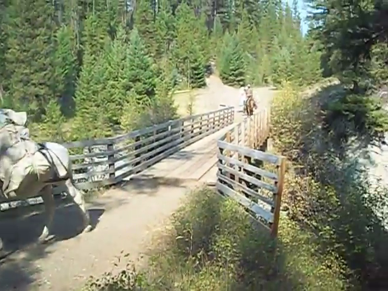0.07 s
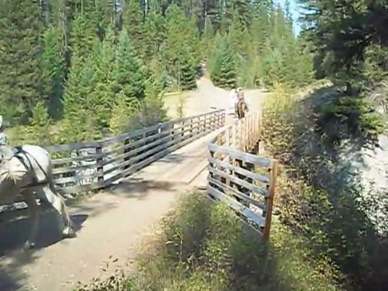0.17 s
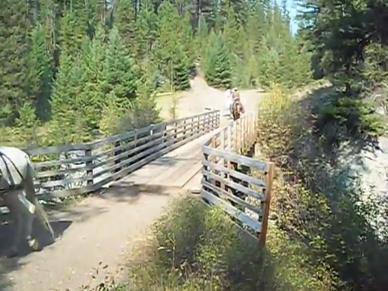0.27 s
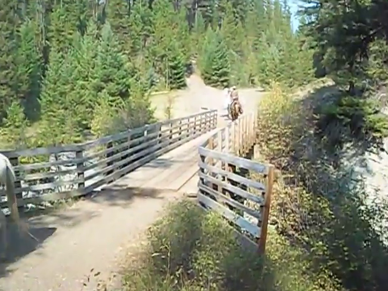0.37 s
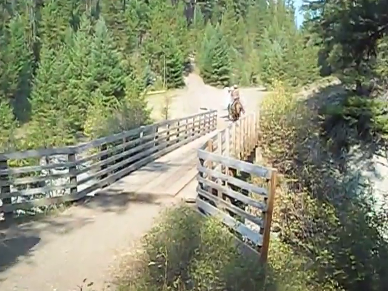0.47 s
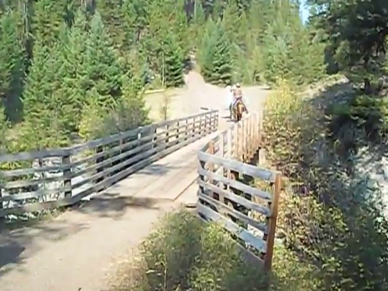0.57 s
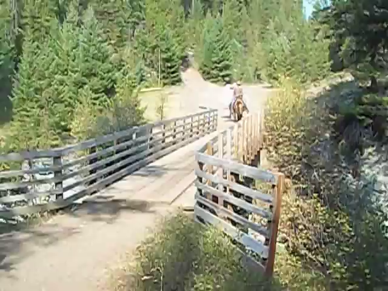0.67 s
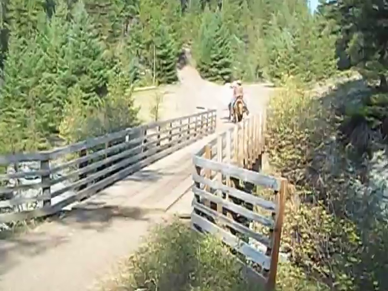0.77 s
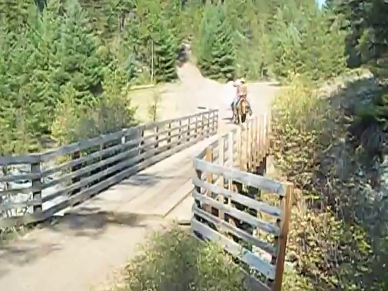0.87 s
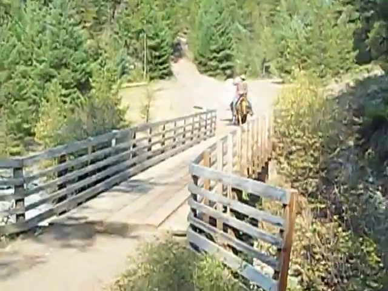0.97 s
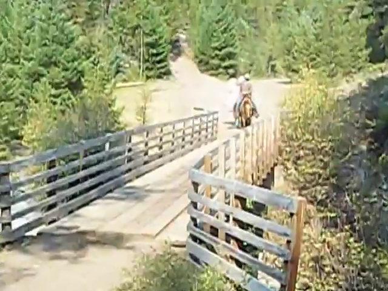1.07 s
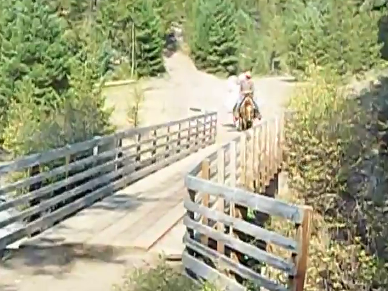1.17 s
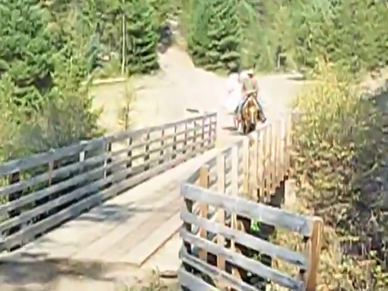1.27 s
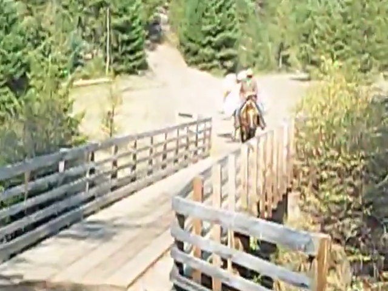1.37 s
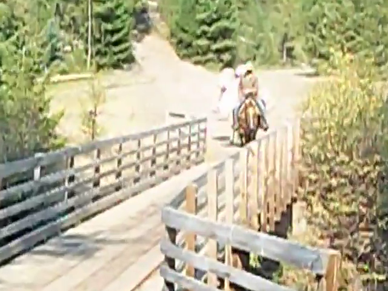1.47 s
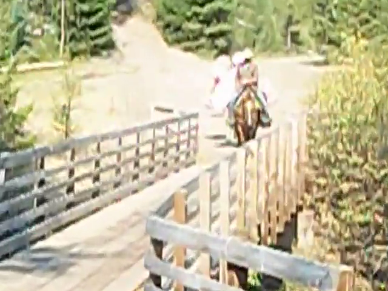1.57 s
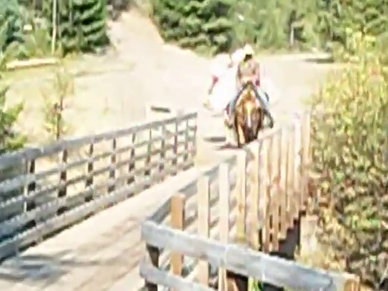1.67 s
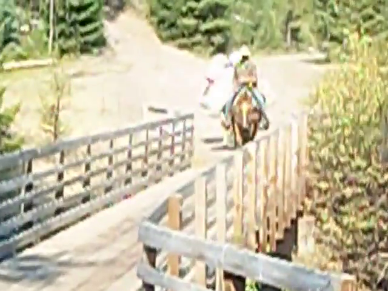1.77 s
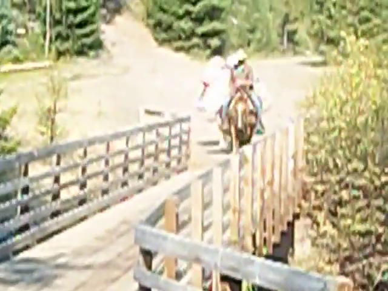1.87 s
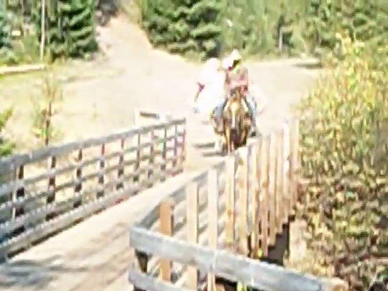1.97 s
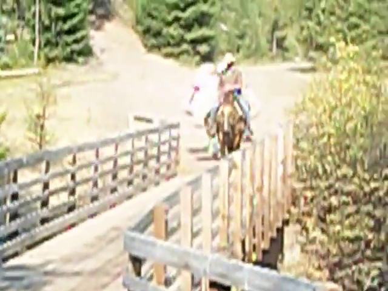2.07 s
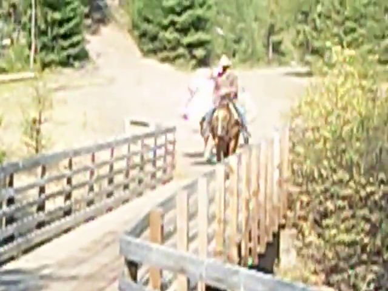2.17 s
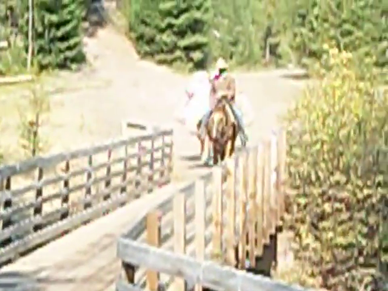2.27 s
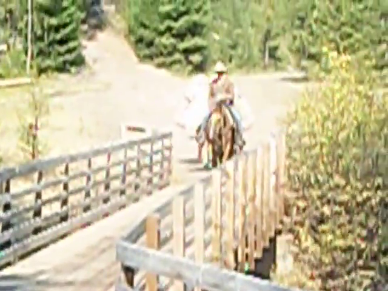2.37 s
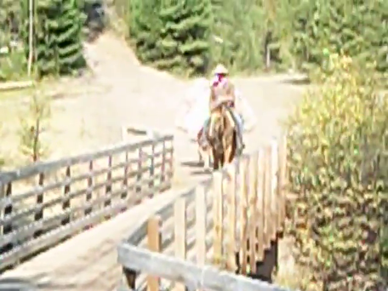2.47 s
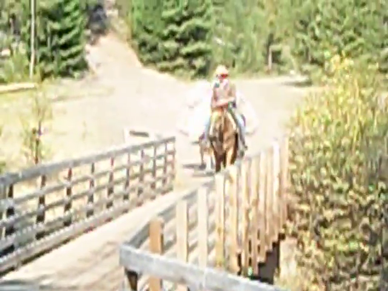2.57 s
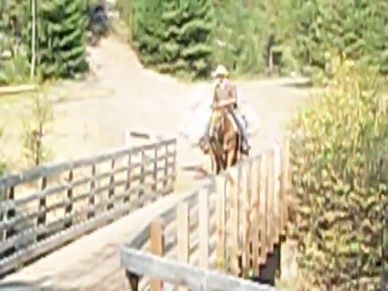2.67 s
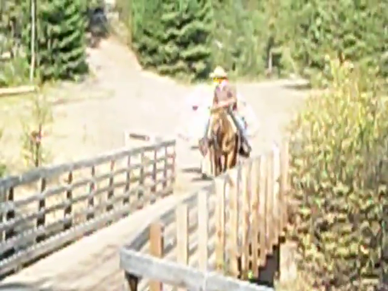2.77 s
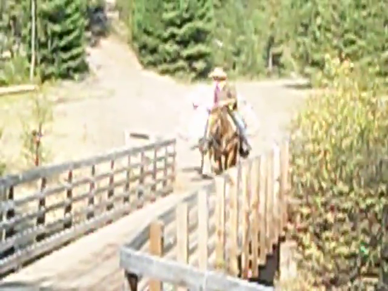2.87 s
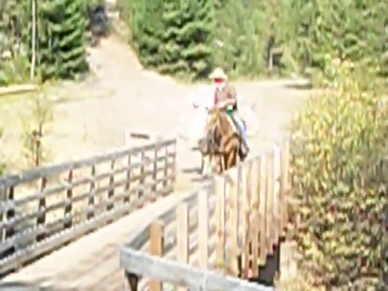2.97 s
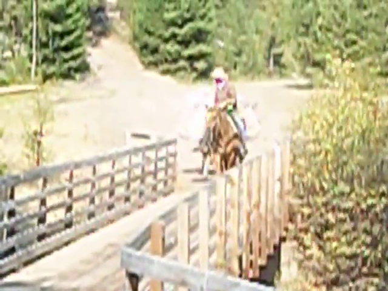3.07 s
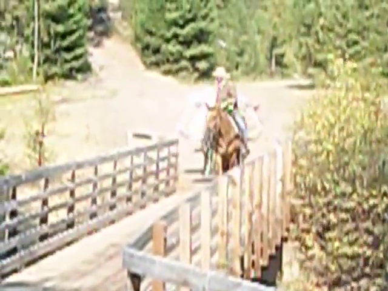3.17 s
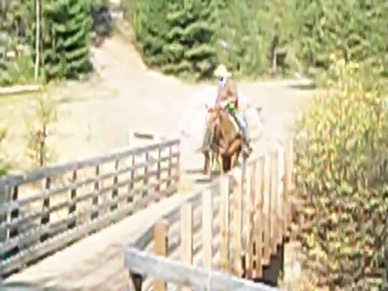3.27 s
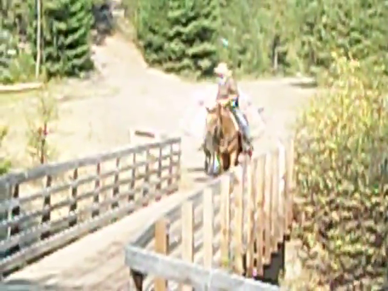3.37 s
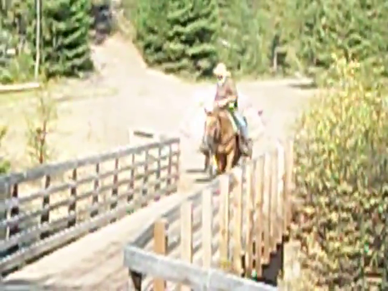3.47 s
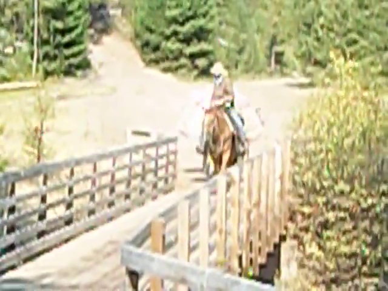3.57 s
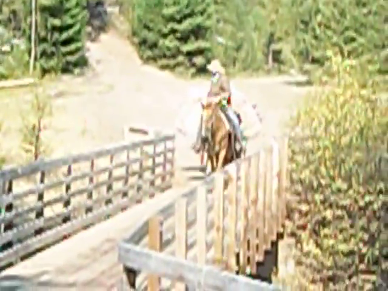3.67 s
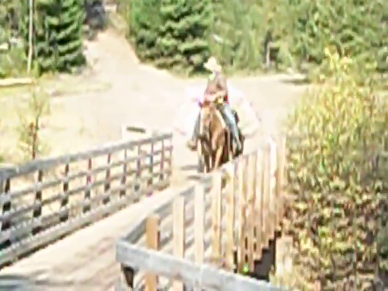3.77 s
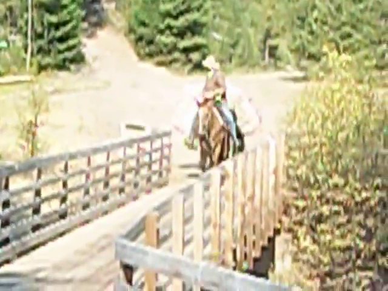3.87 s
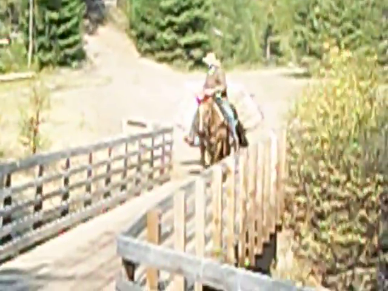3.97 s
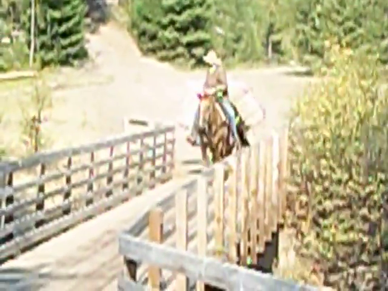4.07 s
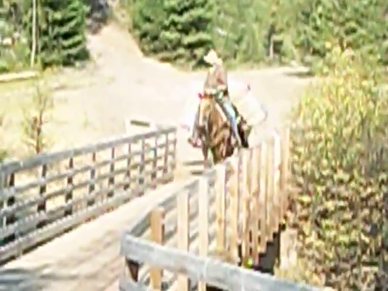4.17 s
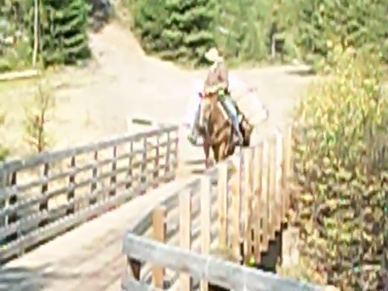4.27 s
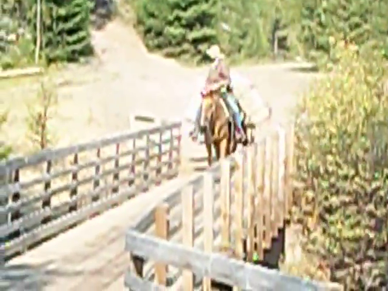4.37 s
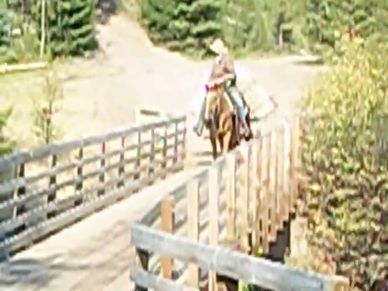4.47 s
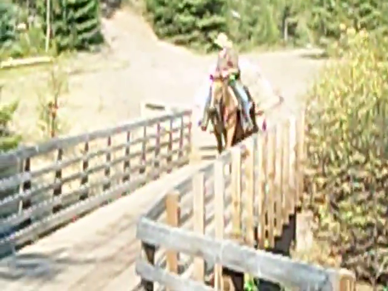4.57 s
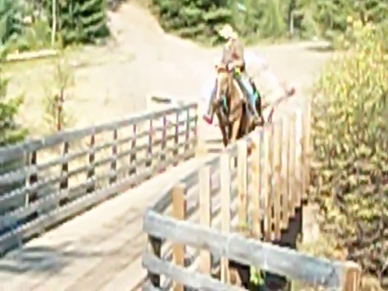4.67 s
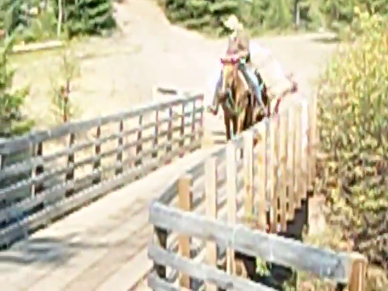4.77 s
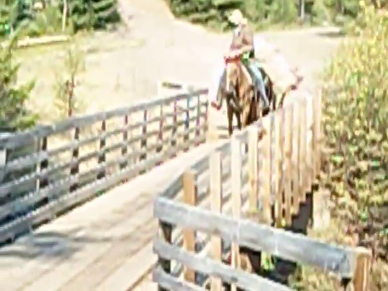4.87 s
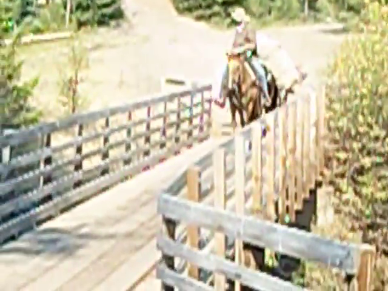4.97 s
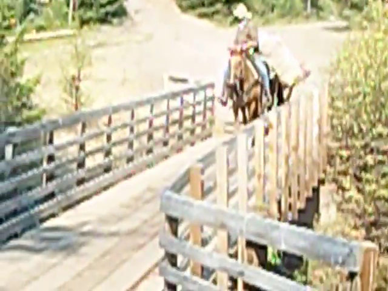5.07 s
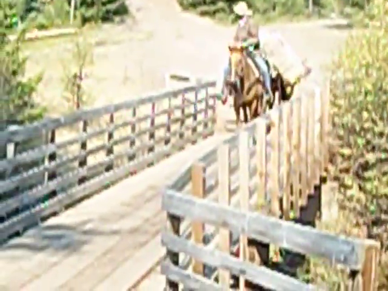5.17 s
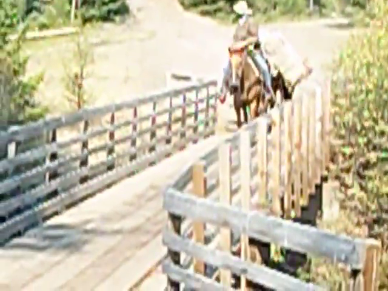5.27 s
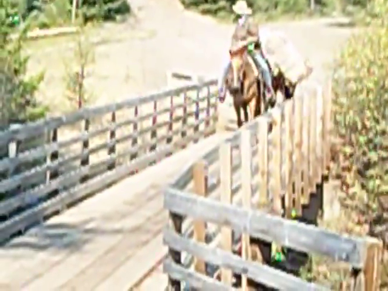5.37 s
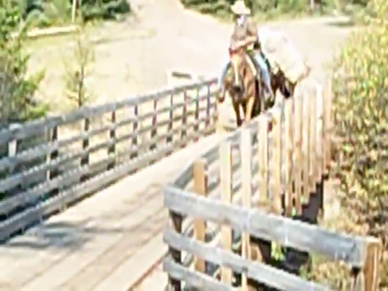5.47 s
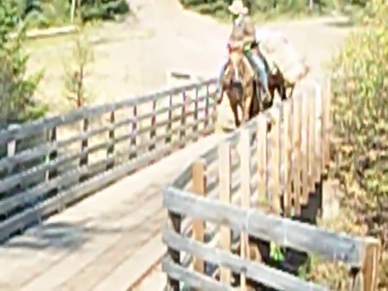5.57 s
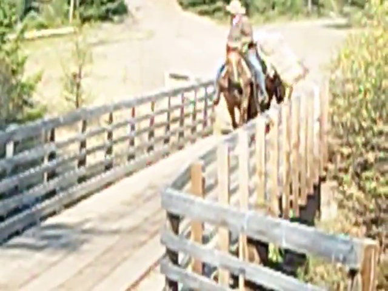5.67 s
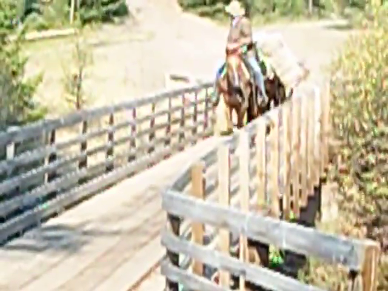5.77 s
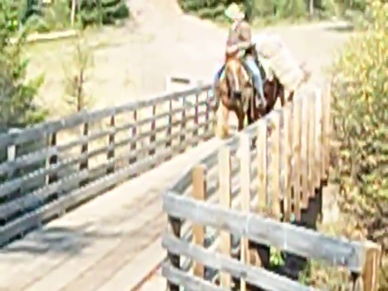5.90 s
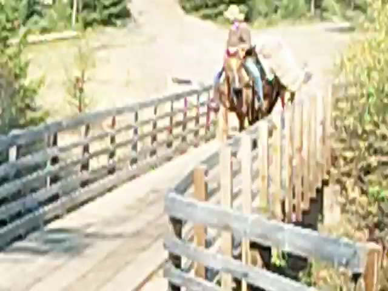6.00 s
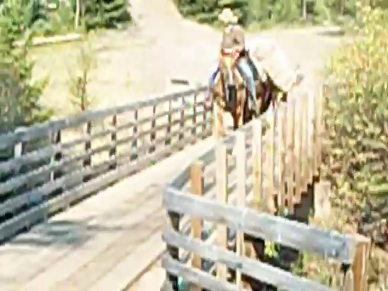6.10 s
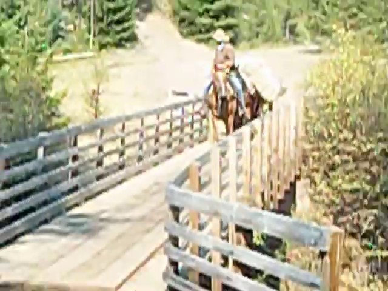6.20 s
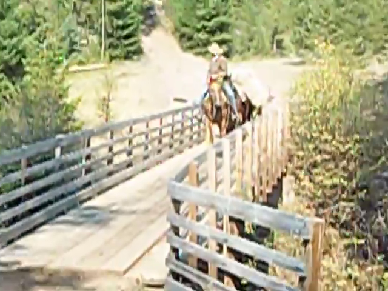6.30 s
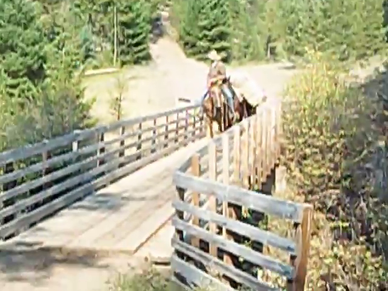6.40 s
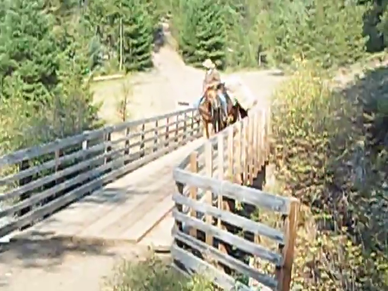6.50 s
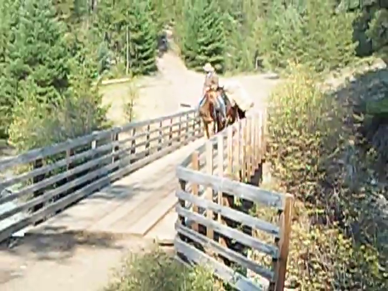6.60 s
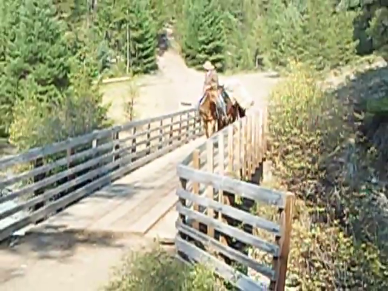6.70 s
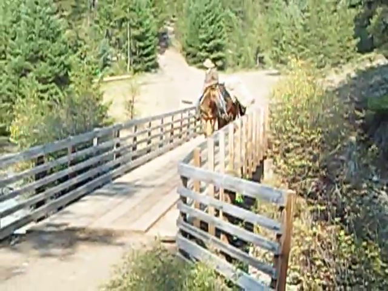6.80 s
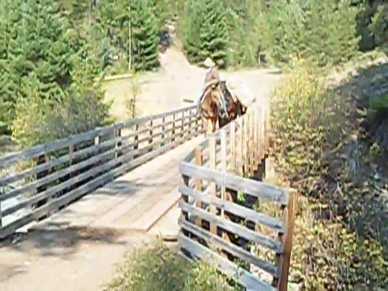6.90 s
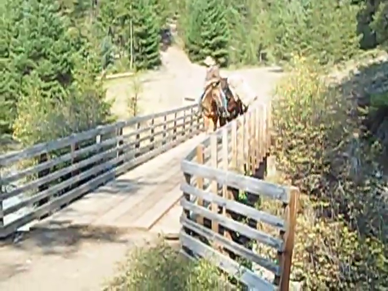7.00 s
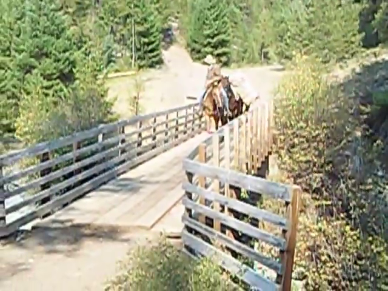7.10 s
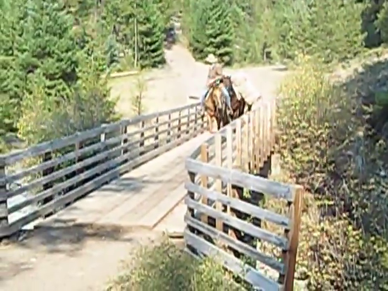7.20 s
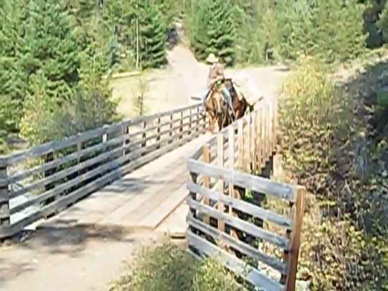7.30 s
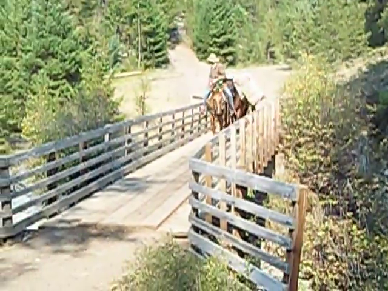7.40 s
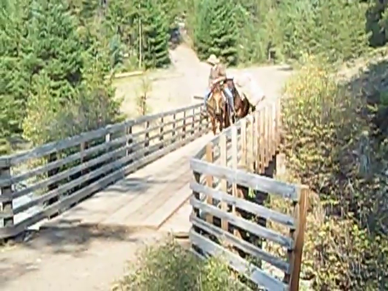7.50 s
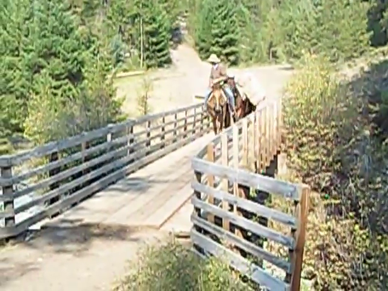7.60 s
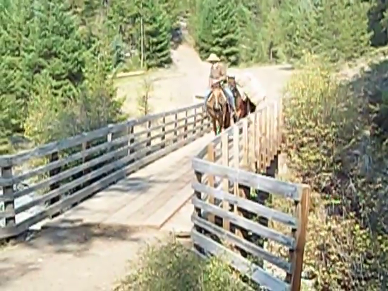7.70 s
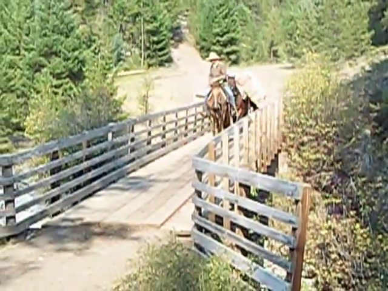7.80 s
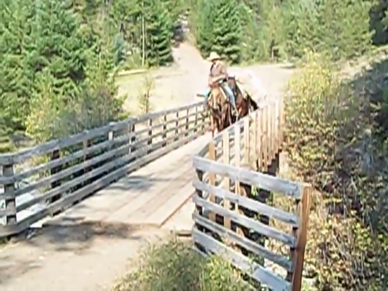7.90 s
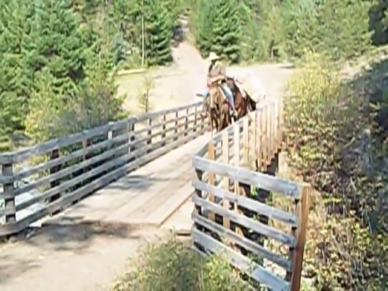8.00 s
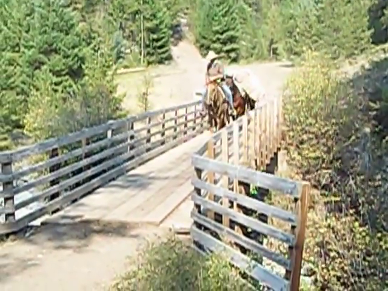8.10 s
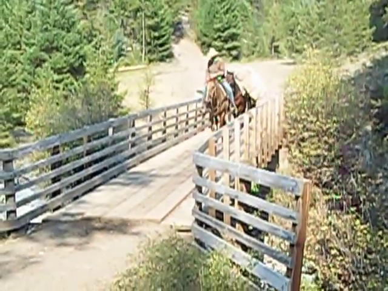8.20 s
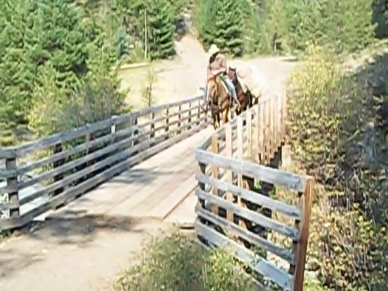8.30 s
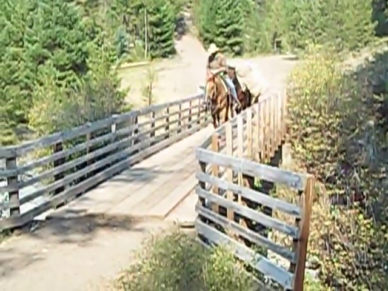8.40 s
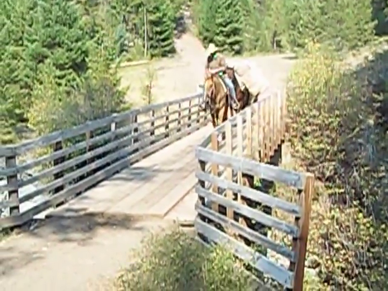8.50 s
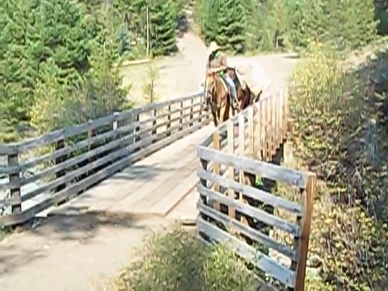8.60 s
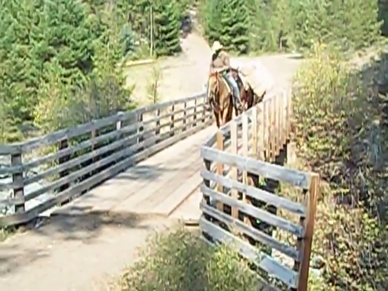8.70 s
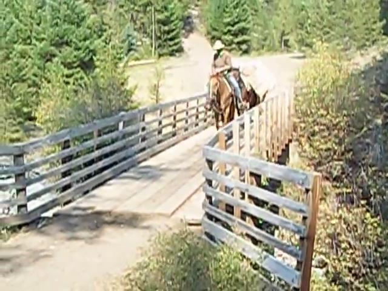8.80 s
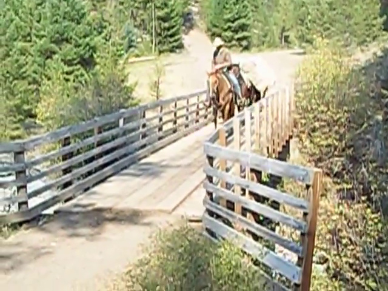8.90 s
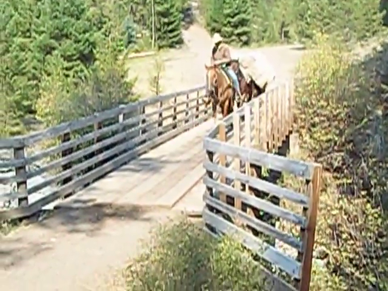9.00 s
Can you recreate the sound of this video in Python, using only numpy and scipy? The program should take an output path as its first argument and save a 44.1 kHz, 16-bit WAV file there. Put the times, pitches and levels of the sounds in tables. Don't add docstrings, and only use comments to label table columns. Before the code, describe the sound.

Loud plastic snaps close by, then slow hoof clops and deep deck thuds growing nearer on loose planks, over faint rushing water.

```python
import sys
import numpy as np
from scipy import signal
from scipy.io import wavfile

SR = 44100
rng = np.random.default_rng(int(sys.argv[2]) if len(sys.argv) > 2 else 0)


def voltage_ratio(level):
    return 10 ** (np.asarray(level, float) / 20)


def generate_wav(sig):
    pcm = np.round(np.clip(np.atleast_2d(sig).T, -1, 1) * 32767).astype(np.int16)
    wavfile.write(sys.argv[1], SR, pcm)


N = 399105


def rms_one(x):
    return x / np.sqrt(np.mean(x ** 2) + 1e-20)


def band(x, low_hz, high_hz, order=2):
    sos = signal.butter(order, [low_hz, min(high_hz, 0.45 * SR)], "band", fs=SR, output="sos")
    return signal.sosfilt(sos, x + 1e-18)


def seconds_axis(seconds):
    return np.arange(int(seconds * SR)) / SR


def fade(t, t60):
    return voltage_ratio(-60 * t / t60)


def drift(rate_hz):
    r = np.exp(-2 * np.pi * rate_hz * 40 / SR)
    slow = signal.lfilter([1], [1, -2 * r, r * r], rng.standard_normal(N // 40 + 2002))[2000:]
    return np.interp(np.arange(N) / 40, np.arange(len(slow)), rms_one(slow))


def ring(force, hz, t60):
    r = voltage_ratio(-60 / (t60 * SR))
    w = 2 * np.pi * hz / SR
    return signal.lfilter([0, np.sin(w)], [1, -2 * r * np.cos(w), r * r], force + 1e-18)


def contact(seconds, size):
    push = np.zeros(size)
    bump = np.hanning(max(int(seconds * SR), 3) + 2)[1:-1]
    push[:len(bump)] = bump / bump.sum()
    return push


def body(force, modes, spread_db, detune):
    total = 0
    for k, (hz, db, t60) in enumerate(modes):
        strength, shift = rng.standard_normal(2)
        tone = ring(force, hz * (1 + detune * shift), t60)
        total = total + voltage_ratio(db + spread_db * strength) * tone * (-1) ** k
    return total


def add(track, wave, s, peak_db):
    i = max(int(s * SR), 0)
    track[i:i + len(wave)] += (voltage_ratio(peak_db) * wave / np.abs(wave).max())[:N - i]


# pitch in Hz, level in dB per Hz.
STREAM_COLOUR = [(24, -38.5), (40, -15), (90, -5), (146, 2), (331, 2.5), (514, -5), (674, -1.5), (867, 2),
                 (1320, -9), (2040, -8), (2680, -6.5), (3910, -14), (4620, -12), (5020, -14), (5500, -24),
                 (5940, -27.5), (13100, -120)]


def stream(level_db):
    colour_hz, colour_db = np.transpose(STREAM_COLOUR)
    hz = np.maximum(np.fft.rfftfreq(N, 1 / SR), 1)
    colour = voltage_ratio(np.interp(np.log(hz), np.log(colour_hz), colour_db))
    noise = np.fft.irfft(np.fft.rfft(rng.standard_normal(N)) * colour, N)
    low, middle, high = band(noise, 10, 500), -band(noise, 500, 1200), band(noise, 1200, 9000)
    shared = drift(25)
    water = np.zeros(N)
    for part, depth_db in [(low, 1.1), (middle, 1.0), (high, 0.7)]:
        water += part * voltage_ratio(depth_db * (shared + drift(15)))
    return voltage_ratio(level_db) * water / np.std(band(noise, 300, 6000))


# pitch in Hz, level in dB, ring time (to -60 dB) in seconds.
DECK_MODES = [
    (57.4, -4, 0.47),
    (92.2, -6.5, 0.45),
    (116.7, -6, 0.33),
    (137.1, -3, 0.26),
    (169, -3, 0.16),
]


def rumble(level_db):
    shake = rng.standard_normal(N) * voltage_ratio(5.1 * drift(3.4))
    loose = [(hz, db, t60 / 3) for hz, db, t60 in DECK_MODES]
    return voltage_ratio(level_db) * rms_one(band(body(shake, loose, 0, 0), 60, 250))


# time in seconds, stream level in dB, deck rumble level in dB.
BACKGROUND = [
    (0.0, -40, -54),
    (7.591, -39.5, -37.5),
    (7.99, -39, -30),
    (9.05, -40, -34),
]


def background():
    s, stream_db, rumble_db = np.transpose(BACKGROUND)
    t = np.arange(N) / SR
    return stream(np.interp(t, s, stream_db)) + rumble(np.interp(t, s, rumble_db))


def air():
    return voltage_ratio(-58.5 + 2.0 * drift(2)) * rms_one(band(rng.standard_normal(N), 12, 40))


# start in seconds,
# peak level in dB, middle pitch in Hz.
STONE_FLICKS = [(0.337, -31, 2590), (0.4259, -31, 4270), (0.709, -32, 2550), (0.7483, -26.5, 2220),
                (0.9852, -31, 2520), (1.237, -32, 1950), (1.289, -20, 2400), (1.306, -24.5, 2580),
                (1.5307, -26.5, 2590), (1.607, -37, 4400), (1.644, -22, 4570), (1.8255, -26.5, 2530),
                (2.0755, -30, 2600), (2.135, -31.5, 2340), (2.624, -32, 1900), (2.6933, -24, 2120),
                (2.9483, -30.5, 2250), (3.3687, -31, 2640), (3.5269, -32, 2060), (4.268, -21, 2390),
                (4.283, -22, 1190), (4.2905, -26, 2160), (4.296, -34, 2310), (4.4563, -28, 2000),
                (4.7293, -29, 2540), (5.3812, -30, 2210), (0.5877, -26, 4000), (1.7236, -20, 660),
                (4.9176, -19, 1480), (1.211, -32, 4350), (1.243, -34, 4300), (6.2405, -37, 2870),
                (6.4936, -26, 2780), (8.448, -24.5, 1320), (8.152, -29, 1350), (8.22, -25, 1400),
                (1.332, -30, 3620)]
# start in seconds, peak level in dB, middle pitch in
# Hz.
CHIPS_AND_GRIT = [
    (2.1, -27, 2200),
    (3.3, -29.5, 4200),
    (2.478, -33, 4000),
    (4.098, -21.5, 1500),
    (3.3, -25, 2700),
    (3, -20, 1100),
    (1.6, -27.5, 4400),
    (3.912, -25, 1460),
                  (0.077, -26, 2600),
    (0.077, -31.5, 4800),
    (0.603, -33, 3400),
    (0.885, -30, 4450),
    (1.364, -28, 1220),
    (2.911, -29, 1170),
    (2.974, -27, 1170),
    (3.263, -28, 3900),
    (8.633, -33, 3390),
    (6.2403, -19, 1050),
]


def flicks(rows):
    out, t = np.zeros(N), seconds_axis(0.03)
    t60 = 0.016
    for s, db, hz in rows:
        force = contact(0.0001, len(t)) + 0.45 * rng.standard_normal(len(t)) * fade(t, t60)
        modes = [(hz * 0.49, -6, t60 * 0.55), (hz, 0, t60), (min(hz * 1.9, 5200), -8, t60 * 0.4)]
        wave = body(force, modes, spread_db=2.8, detune=0.012)
        add(out, band(wave, hz / 2.4, hz * 2.9, order=1), s, db)
    return out


# start in seconds, peak level in dB, pitch of the hollow in Hz.
LEAVING_HOOVES = [(0.079, -20, 740), (0.278, -28, 835), (0.392, -29, 575), (0.45, -23.5, 553),
                  (0.484, -19.5, 846), (0.623, -27.5, 740), (0.745, -25, 810), (0.999, -24, 1000),
                  (1.039, -30, 930), (1.213, -27, 690), (1.295, -26.5, 500), (1.33, -23, 900),
                  (1.374, -28, 740), (1.504, -25.5, 1036), (1.985, -27, 658), (2.144, -25, 723),
                  (2.206, -26, 490), (2.677, -29.5, 815), (2.824, -29, 530)]
# start in seconds, peak level in dB, pitch of the hollow in Hz.
FLAT_HOOVES = [(3.262, -25.5, 513), (3.292, -28, 565), (3.554, -32, 644), (4.319, -24.5, 794),
               (4.48, -27, 793), (4.552, -21.5, 853), (4.631, -24.5, 760), (5.012, -27, 766),
               (5.114, -27.5, 516), (5.299, -19.5, 805), (5.385, -25.5, 744), (5.563, -26, 746),
               (5.78, -30, 557), (6.056, -24, 707), (6.289, -28, 662), (6.33, -31, 866), (6.555, -28, 501),
               (7.005, -35, 845), (7.069, -31.5, 600), (7.205, -30.5, 640), (7.28, -20.5, 787),
               (7.5255, -14, 720), (7.579, -25, 800), (7.711, -34, 686), (8.032, -29, 680),
               (8.221, -12, 710), (8.295, -16.5, 760), (8.525, -19, 714), (8.979, -33, 784),
               (9.03, -27, 830)]
# start in seconds, heel level in dB, heel pitch in Hz,
# delay of the toe in seconds, toe level in dB.
ROLLED_HOOVES = [
    (2.962, -23.5, 700, 0.028, -23),
    (3.832, -20.5, 824, 0.026, -23),
    (4.815, -22, 800, 0.028, -23),
    (6.2541, -13, 665, 0.012, -20.5),
    (6.573, -18.5, 830, 0.01, -21.5),
    (6.892, -18, 740, 0.018, -29),
    (7.82, -19.5, 690, 0.015, -22),
    (8.139, -16, 830, 0.016, -15.5),
    (8.784, -21.5, 863, 0.016, -19),
]


def clops():
    out, t = np.zeros(N), seconds_axis(0.2)
    cup_hz, t60 = 757, 0.038
    hits = LEAVING_HOOVES + FLAT_HOOVES
    for s, heel_db, hz, lag, toe_db in ROLLED_HOOVES:
        hits = hits + [(s, heel_db, hz), (s + lag, toe_db, cup_hz ** 2 / hz)]
    for s, db, hz in sorted(map(tuple, hits)):
        settling = np.clip(t / 0.0014, 0, 1) * fade(t, 1.6 * t60)
        force = contact(0.00064, len(t)) + 0.11 * rng.standard_normal(len(t)) * settling
        splinters = band(force, 700, 2600)
        add(out, splinters, s - 0.001, db - 24.0)
        swell = ring(ring(force, hz, 0.0048), hz, 0.004)
        modes = [(hz, 0, t60 * 0.42), (hz * 0.99, -6, t60 * 0.091),
                 (hz * 1.147, -3, t60 * 0.45), (hz * 0.92, -10, t60 * 0.29)]
        add(out, body(swell, modes, spread_db=4, detune=0.02), s - 0.002, db)
    return out


def under_deck(x):
    t = seconds_axis(0.3)
    scatter = rng.standard_normal(len(t)) * np.clip(t / 0.016, 0, 1) * fade(t, 0.52)
    tail = signal.oaconvolve(x, scatter / np.linalg.norm(scatter))[:N]
    return voltage_ratio(-11) * band(tail, 250, 2200, order=1)


# delay in seconds, level in dB.
ECHO_PATHS = [
    (.013, -16),
    (.024, -20.5),
    (.039, -18),
    (.057, -19.5),
    (.083, -27),
]


def rails(x):
    dull = band(x, 150, 3500, order=1)
    out = np.zeros(N)
    for k, (s, db) in enumerate(ECHO_PATHS):
        late = np.interp(np.arange(N) - s * SR, np.arange(N), dull, left=0)
        out += voltage_ratio(db) * late * (-1) ** k
    return out


# start in seconds, peak level in dB, rattle length in seconds,
# pitch of the lever body in Hz, treble level in dB.
LEVER_HITS = [(0.1326, 10, 0.0048, 1690, -3), (0.1731, -7.5, 0.00023, 1440, -3.5),
              (0.182, -33, 0.0027, 1770, 2), (0.2202, -2, 0.00022, 1370, 0), (0.229, -22, 0.010, 1713, -2),
              (1.7202, -10.5, 0.0016, 2090, 1), (1.7218, -4, .0036, 2120, 0),
              (1.7325, -22, 0.00089, 1830, 2.5), (4.9166, -17, .002, 2300, -6),
              (6.2401, -13, 0.00087, 2780, -10.5), (6.6945, -20, 0.0008, 2820, 5),
              (6.701, -17, 0.0021, 1716, -3.5), (6.7033, -19.5, 0.001, 2030, -2.5),
              (6.7180, -5, 0.0003, 1800, 3)]
# start in seconds, peak level in dB, rattle length in seconds,
# pitch of the lever body in Hz, treble level in dB.
LEVER_BOUNCES = [
    (0.1762, -23, .0003, 1170, -19),
    (1.7344, -16, 0.00059, 1800, -1),
    (4.9198, -16, 0.002, 1400, -5),
    (6.6956, -19, 0.0013, 2780, -5),
    (6.7052, -14, 0.00074, 2280, -4),
    (6.7194, -0.5, 0.0003, 1840, 6),
    (0.1340, -2, 0.0014, 1710, 3),
    (0.188, -29, 0.0029, 1740, -6),
]
# pitch in Hz, level in dB, ring time in seconds.
LEVER_LOW = [
    (463, -1, 0.0044),
    (740, 6.5, 0.0033),
    (1090, 4, 0.004),
]
# multiple of the body pitch, level in dB, ring time in seconds.
LEVER_MIDDLE = [
    (0.762, -7, 0.0083),
    (1.001, 1, 0.0099),
    (1.249, 2, 0.0023),
]
# pitch in Hz, level in dB, ring time in seconds.
LEVER_HIGH = [
    (2600, -3, 0.0024),
    (2974, -1, 0.0076),
    (3420, -8.5, 0.0031),
    (4300, 3.5, 0.0033),
    (5200, -2, 0.0064),
    (6200, -2, 0.009),
]


def snaps(rows):
    out, t = np.zeros(N), seconds_axis(0.15)
    size = len(t)
    for s, db, length, hz, treble_db in rows:
        bass_db = -5.5 + 0.25 * min(db, 0) - 1.6 * treble_db
        touches = (rng.random(size) < 4000 / SR) * rng.choice([-1, 1], size) * rng.uniform(0.71, 1, size)
        rattle = np.clip((length - t) / 0.0005, 0, 1)
        rattle += 0.24 * fade(np.maximum(t - length, 0), 0.024)
        force = touches * rattle * (1 - 0.3 * np.clip(t / length, 0, 1))
        force[0] = 0.51
        held = 0.74 if length < 0.00028 else 1
        middle = [(k * hz, level, t60 * held) for k, level, t60 in LEVER_MIDDLE]
        wave = body(force, middle, spread_db=1, detune=0.02)
        wave += voltage_ratio(treble_db) * body(force, LEVER_HIGH, spread_db=0.86, detune=0.01)
        wave += voltage_ratio(bass_db) * body(force, LEVER_LOW, spread_db=1.0, detune=0.011)
        wave += 6.0 * band(force, 680, 4000, order=1)
        add(out, band(wave, 280, 6400), s, db)
    return out


# start in seconds, peak level in dB,
# pitch in Hz, ring time in seconds.
CAMERA_RINGS = [(0.1342, -2, 5190, .016), (0.139, -23, 5000, 0.04), (0.1345, -8, 1000, .018),
                (0.1733, -18, 5250, .012), (0.2204, -15, 5400, .012), (0.139, -25, 1650, 0.09),
                (0.2245, -24, 1720, 0.05), (0.2246, -30, 3150, 0.04), (1.726, -34, 5250, 0.1),
                (1.727, -26, 1750, .05), (1.728, -32, 3140, 0.08), (6.242, -18, 1690, 0.04),
                (6.241, -19, 2830, .012), (1.7226, -11, 5200, .016), (1.7222, -13, 1310, .018),
                (1.7228, -20, 5650, .01), (1.7232, -10, 2125, .018), (1.7238, -12, 3035, .016),
                (4.9168, -19, 2380, .008), (4.917, -22, 560, .02), (6.7180, -9, 1840, .022),
                (6.7184, -16, 3570, .01), (6.7184, -16, 4310, .01), (6.718, -21, 3160, 0.07),
                (6.719, -29, 5787, 0.11), (6.720, -26, 5230, 0.11), (6.6955, -18, 5230, .013),
                (6.701, -19, 5200, .012)]


def housing():
    out, size = np.zeros(N), int(0.15 * SR)
    for s, db, hz, t60 in CAMERA_RINGS:
        add(out, -ring(contact(0.0001, size), hz, t60), s, db)
    return out


# start in seconds, peak level in dB, length in seconds,
# middle pitch in Hz.
HOOF_DRAGS = [(0.294, -26, 0.11, 2190), (0.348, -23, 0.078, 890), (0.436, -27, 0.072, 1400),
              (0.627, -25, 0.066, 2160), (0.977, -23.5, 0.081, 2020), (1.201, -26, 0.064, 2600),
              (1.291, -26.5, .11, 1500), (1.498, -31, .05, 2480), (2.076, -37, 0.25, 2300),
              (2.651, -26, 0.19, 2400), (2.949, -31, 0.085, 1190), (2.391, -25, 0.036, 2360),
              (4.3, -34, 0.025, 2400), (8.14, -26, 0.043, 1440), (8.223, -32, 0.062, 1440)]


def scuffs():
    out, t = np.zeros(N), seconds_axis(0.3)
    size = len(t)
    for s, db, length, hz in HOOF_DRAGS:
        grains = (rng.random(size) < 1800 / SR) * rng.standard_normal(size)
        grains *= voltage_ratio(3.14 * rng.exponential(1, size))
        slide = np.sin(np.pi * np.clip(t / length, 0, 1)) ** 0.18
        add(out, band(grains * slide, hz / 2.0, hz * 1.23), s, db)
    return out


# start in seconds, peak
# level in dB, middle pitch in Hz.
GRIT_TICKS = [(0.312, -26.5, 2820), (0.488, -25, 2640), (0.587, -25, 2040), (0.65, -31, 1890),
              (0.673, -31, 1970), (0.8828, -29.5, 2430), (1.0186, -26, 2060), (1.1998, -27.5, 1570),
              (0.3566, -28.5, 2580), (1.332, -23, 1640), (1.6174, -27, 2320), (1.6416, -24.5, 1640),
              (2.097, -29, 2380), (2.2082, -28, 1900), (2.2396, -28.5, 4430), (2.4587, -29, 2770),
              (2.564, -23, 2280), (2.67, -23.5, 2380), (2.754, -22.5, 2460), (3.2627, -22.5, 2300),
              (3.5868, -30, 2470), (3.839, -26.5, 2430), (4.079, -21.5, 2970), (8.6353, -33, 2220),
              (5.1244, -24, 1360), (5.61, -29.5, 2440), (6.0367, -24, 2620), (6.0556, -26, 2370),
              (6.173, -26.5, 5200), (6.486, -25.5, 2600)]


def ticks():
    out, t = np.zeros(N), seconds_axis(0.08)
    for s, db, hz in GRIT_TICKS:
        burst = rng.standard_normal(len(t)) * fade(t, 0.031) * np.clip(t / 0.002, 0, 1)
        sparkle_db = -12 + 11 * np.log2(hz / 2400)
        wave = band(burst, hz / 1.24, hz * 1.2) + voltage_ratio(sparkle_db) * band(burst, 3600, 4900)
        add(out, wave, s - 0.001, db + 0.23)
    return out


# start in seconds, weight level in dB, boom pitch in Hz,
# end plank level in dB, plank pitch in Hz.
STEPS_OFF = [(0.35, -34, 116, -32, 223), (0.449, -40, 156, -33, 390), (0.878, -46, 211, -39, 262),
             (1.034, -30, 144, -30, 320), (1.214, -27, 125, -27.5, 208), (1.303, -25, 151, -25.5, 210),
             (1.65, -31, 204, -23.5, 293), (1.863, -36.5, 85.5, -30.5, 200), (1.983, -34.5, 114, -46, 250),
             (2.21, -24.5, 169, -26, 235), (2.565, -34, 115, -42, 250)]
# start in seconds, peak level in dB, deck pitch in Hz.
PAIR_THUDS = [(2.115, -24, 68.4), (2.697, -23, 71), (2.978, -26.5, 85.4), (3.266, -25.5, 69),
              (3.383, -35.5, 64), (3.551, -30, 78), (3.805, -24.5, 64.5), (4.313, -23, 116),
              (4.52, -32, 70), (4.616, -22, 158), (4.802, -26, 108), (5.273, -24, 90), (5.55, -20, 159),
              (5.742, -29, 152), (5.922, -25.5, 195), (6.046, -28.5, 159), (6.228, -18, 79),
              (6.54, -26.5, 156), (6.757, -24.5, 221), (6.887, -20.5, 164), (7.199, -26.5, 101),
              (7.279, -18.5, 137.4), (7.527, -14, 129), (7.794, -27, 107), (8.018, -23, 153),
              (8.112, -23.5, 90), (8.138, -15, 154), (8.429, -23.5, 72), (8.52, -19.5, 149),
              (8.78, -17.5, 144)]


def thuds():
    out, t = np.zeros(N), seconds_axis(0.5)
    share = t / 0.012
    leaving = [(s - 0.0044, db, hz) for s, db, hz, _, _ in STEPS_OFF]
    for s, db, hz in leaving + PAIR_THUDS:
        beams_db = -27.5 if s < 2.05 else -6.5
        t60 = 0.17 * (hz / 100) ** -0.39
        uneven = 0.031 * rng.standard_normal(len(t)) * share * np.exp(1 - share)
        force = signal.lfilter([0.05], [1, -0.95], contact(0.0045, len(t)) + uneven)
        boom = ring(force, hz, np.clip(0.8 * t60, 0.03, 0.5))
        boom += voltage_ratio(beams_db) * body(force, DECK_MODES, spread_db=1.0, detune=0.03)
        add(out, band(boom, 65, 600, order=1), s - 0.003, db + 0.5)
    return out


# start in seconds, peak level in dB, plank pitch in Hz.
PLANK_KNOCKS = [(2.099, -27, 431), (2.91, -40, 276), (2.972, -22, 326), (3.545, -28.5, 398),
                (3.842, -31, 249), (4.308, -32, 236), (4.471, -30, 257), (4.731, -30.5, 320),
                (4.809, -26.5, 210), (5.281, -32, 347), (5.311, -24.5, 319), (5.379, -30.5, 258),
                (5.926, -27, 320), (6.257, -23, 292), (6.311, -30.5, 212), (6.551, -34, 328),
                (6.601, -31, 272), (6.743, -28.5, 275), (6.889, -27, 413), (7.521, -33, 324),
                (7.545, -24, 346), (7.588, -27, 250), (7.821, -26, 325), (8.137, -25.5, 211),
                (8.222, -24.5, 320), (8.239, -28, 319), (8.292, -29, 308), (8.518, -22.5, 336),
                (8.79, -28, 350), (8.821, -25.5, 214)]
# pitch in Hz, level in dB, ring time in seconds.
PLANK_MODES = [
    (250, -6.5, 0.28),
    (293, -6.5, 0.19),
    (349.4, -5.5, 0.32),
    (404, 7.5, 0.037),
    (449, -8.5, 0.51),
]


def knocks():
    out, size = np.zeros(N), int(0.15 * SR)
    end_planks = [(s, db, hz) for s, _, _, db, hz in STEPS_OFF]
    for s, db, hz in end_planks + PLANK_KNOCKS:
        force = contact(0.0022, size)
        wave = ring(force, hz, 0.069) + voltage_ratio(-10.5) * body(force, PLANK_MODES, spread_db=5.0, detune=0.05)
        add(out, wave, s - 0.001, db + 2.5)
    return out


# start in seconds, peak level in dB, pitch in Hz.
SOFT_TONES = [(0.37, -28, 328), (0.402, -33, 317), (1.272, -24.5, 737), (1.404, -29.5, 290),
              (1.64, -32.5, 209), (1.645, -23.5, 888), (2.11, -22, 672), (2.137, -25.5, 150),
              (3.995, -27.5, 349), (4.09, -27, 172), (4.568, -27, 145), (4.736, -30, 150), (5.297, -27, 145),
              (5.434, -29, 247), (6.545, -23, 780), (6.575, -23, 317), (6.584, -28, 145), (7.29, -28, 242),
              (7.571, -21, 130), (7.615, -32, 107), (7.783, -31, 279), (7.85, -22, 129), (7.872, -25, 387),
              (8.2, -28, 107), (8.204, -24, 791), (8.37, -30, 317), (8.44, -23, 156), (8.517, -22, 800),
              (8.769, -27, 355), (8.784, -19, 150), (8.811, -27, 400), (8.85, -34, 400), (8.91, -26, 140)]


def soft_tones():
    out, size = np.zeros(N), int(0.2 * SR)
    for s, db, hz in SOFT_TONES:
        push = contact(0.41 / hz, size)
        add(out, ring(push, hz, 16 / hz), s, db)
    return out


# start in seconds, peak level in dB, middle pitch in Hz,
# level of the crack in dB.
SHOE_STRIKES = [
    (1.863, -13.5, 347, -17),
    (2.624, -19.5, 508, -4),
    (2.91, -25, 298, -8),
    (3.032, -18.5, 690, -16),
    (3.909, -17.5, 810, -25.5),
    (3.996, -13.5, 835, -11),
    (4.269, -11, 740, -11),
    (5.852, -25.5, 603, -12),
    (7.769, -17, 840, -13),
    (8.4452, -14.5, 604, -12),
]


def strikes():
    out, t = np.zeros(N), seconds_axis(0.06)
    t60 = 0.013
    for s, db, hz, crack_db in SHOE_STRIKES:
        modes = [(hz * 0.71, -8, t60 * 1.4), (hz, 0, t60), (hz * 1.29, -3, t60 * 0.54)]
        pulse = body(contact(0.0004, len(t)), modes, spread_db=2, detune=0.03)
        add(out, pulse, s - 0.0003, db)
        grit = rng.standard_normal(len(t)) * fade(t, 0.0055)
        add(out, band(grit, 1100, 3800), s - 0.0003, db + crack_db + 0.5)
    return out


def boards():
    out = np.zeros(N)
    for s, db, *_ in FLAT_HOOVES + ROLLED_HOOVES:
        out[int(s * SR)] = voltage_ratio(db + 21)
    return band(out, 450, 1300, order=1)


def scene():
    bed = background()
    hollow = clops()
    hard = knocks() + strikes() + soft_tones()
    echoes = rails(hollow + voltage_ratio(-4.0) * hard)
    lever = snaps(LEVER_HITS)
    steps = hollow + hard + thuds() + ticks() + scuffs()
    bed += air()
    stones = flicks(STONE_FLICKS)
    lever += snaps(LEVER_BOUNCES) + housing()
    tail = under_deck(voltage_ratio(-6) * hollow + hard + boards())
    stones += flicks(CHIPS_AND_GRIT)
    return (bed + steps + echoes + tail + stones + lever)[None]


def roll_off(x):
    return signal.sosfilt(signal.butter(12, 6800, fs=SR, output="sos"), x)


def record(dry):
    x = signal.sosfilt(signal.butter(1, 45, "high", fs=SR, output="sos"), dry)
    x = np.clip(x, -0.82, 0.82)
    x = signal.sosfilt(signal.butter(6, 5500, fs=SR, output="sos"), x)
    x = signal.sosfilt(signal.ellip(10, 0.5, 85, 5900, fs=SR, output="sos"), x)
    return roll_off(np.clip(x, -1, 1))


dry = scene()
out = record(dry)
generate_wav(out)
```